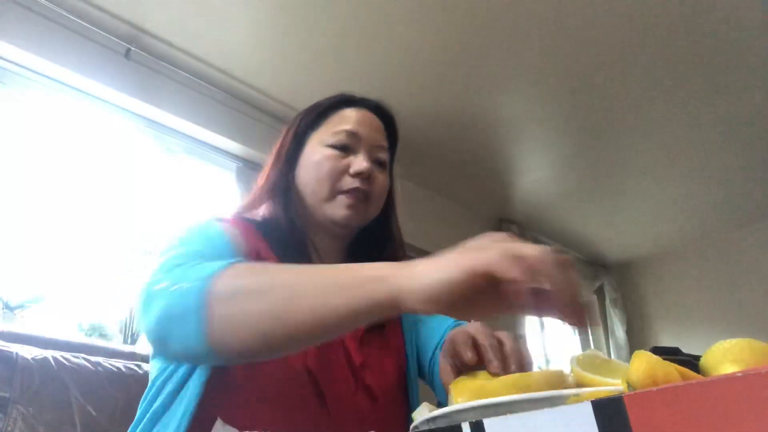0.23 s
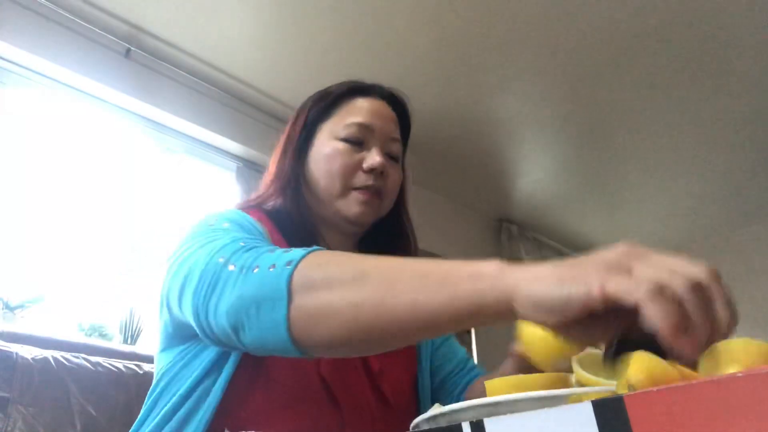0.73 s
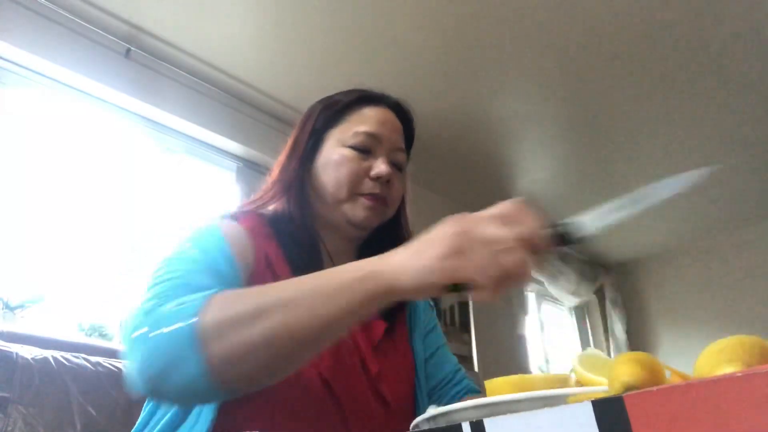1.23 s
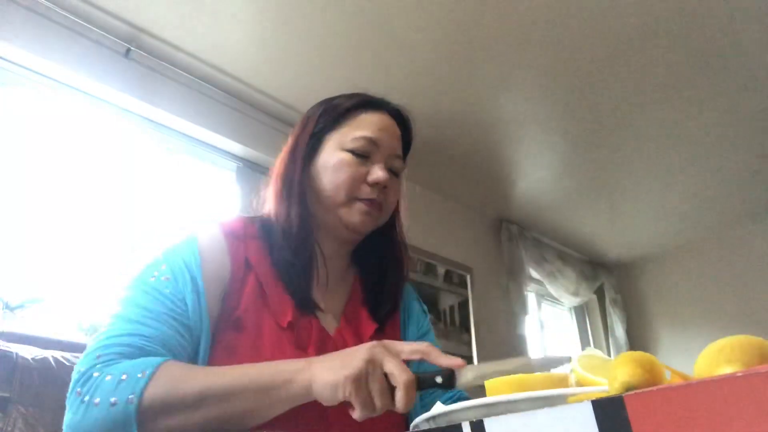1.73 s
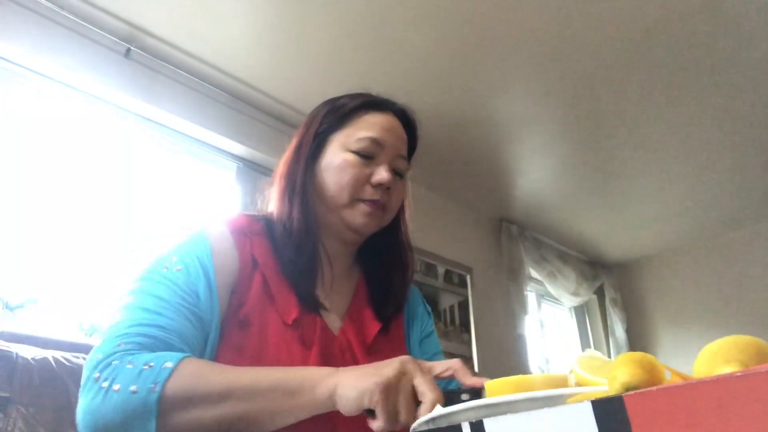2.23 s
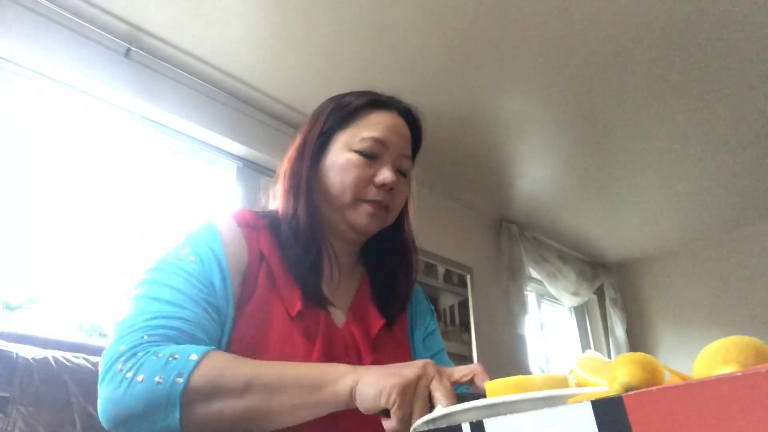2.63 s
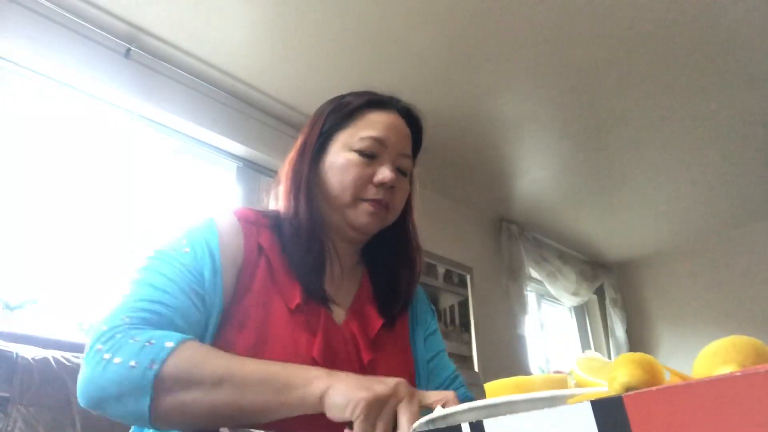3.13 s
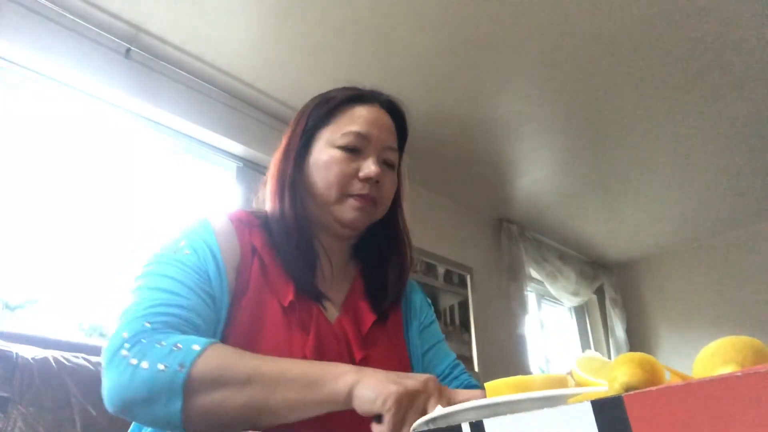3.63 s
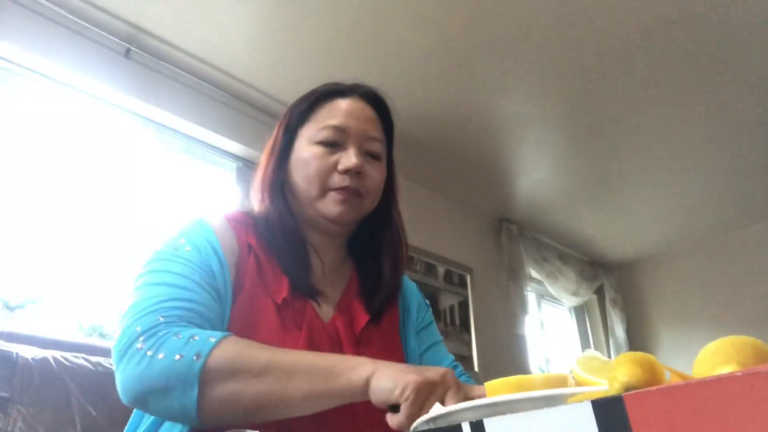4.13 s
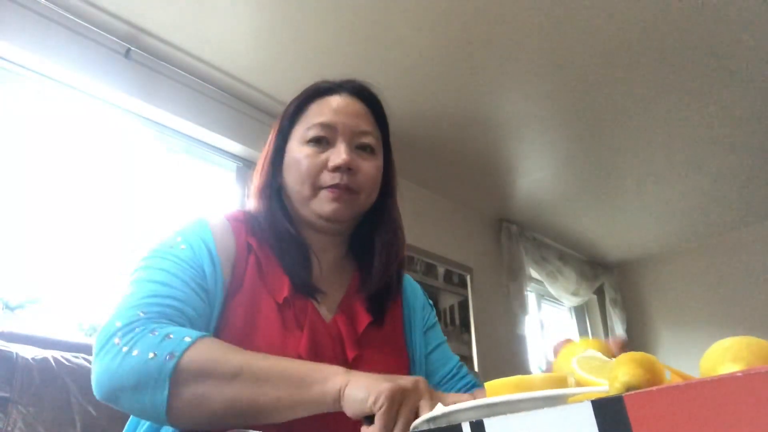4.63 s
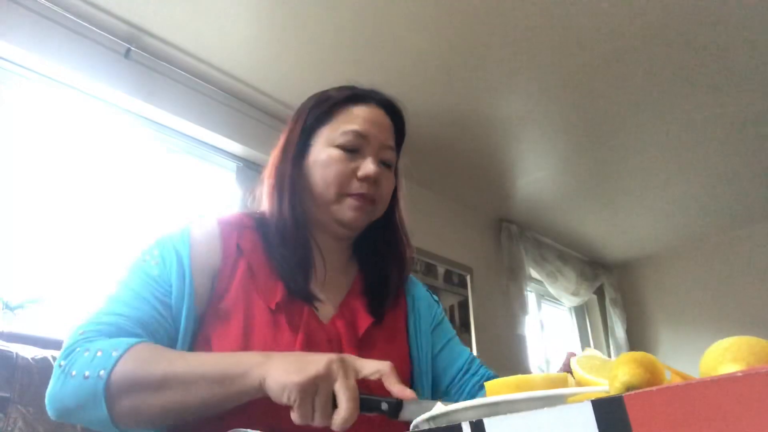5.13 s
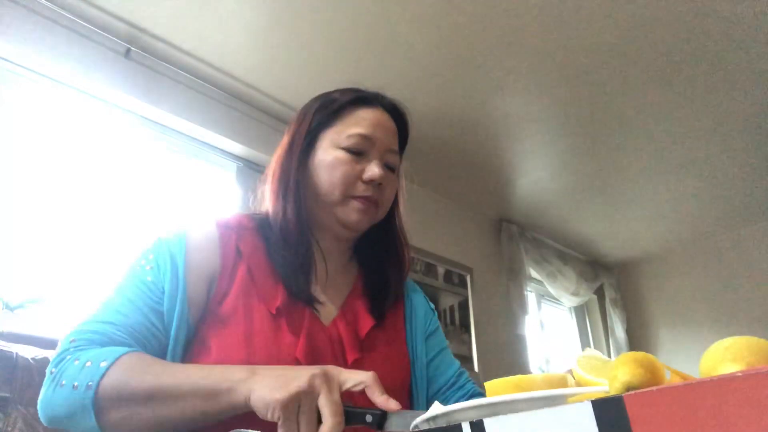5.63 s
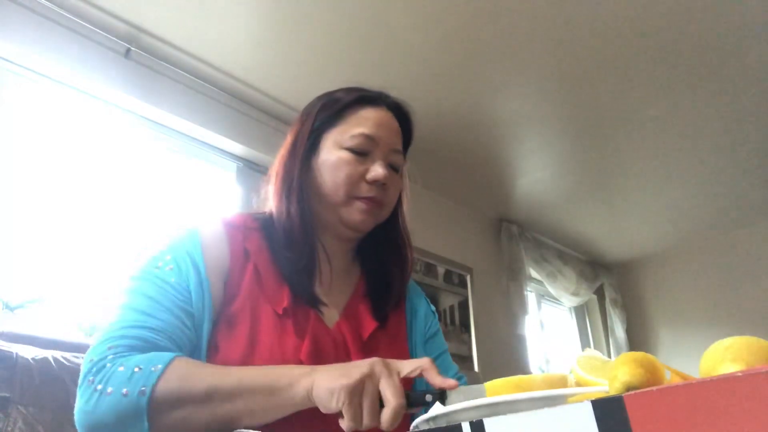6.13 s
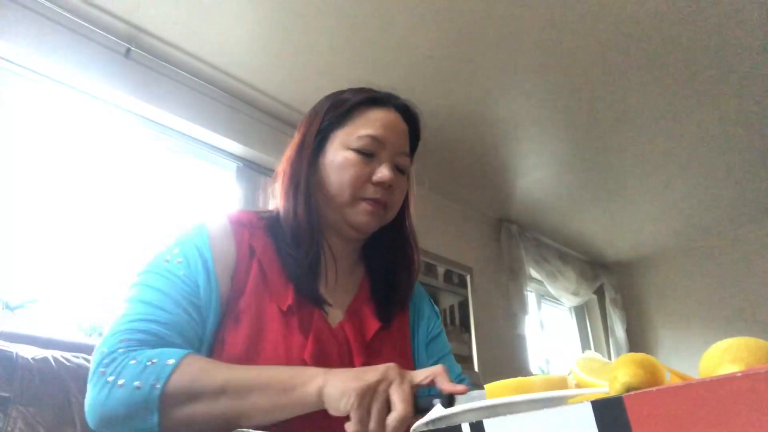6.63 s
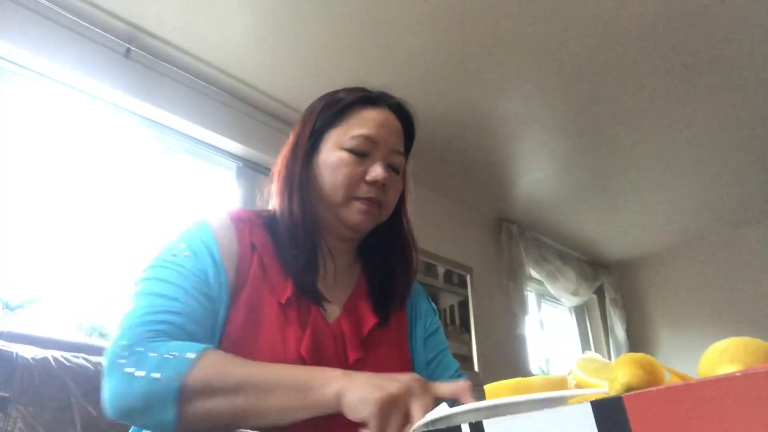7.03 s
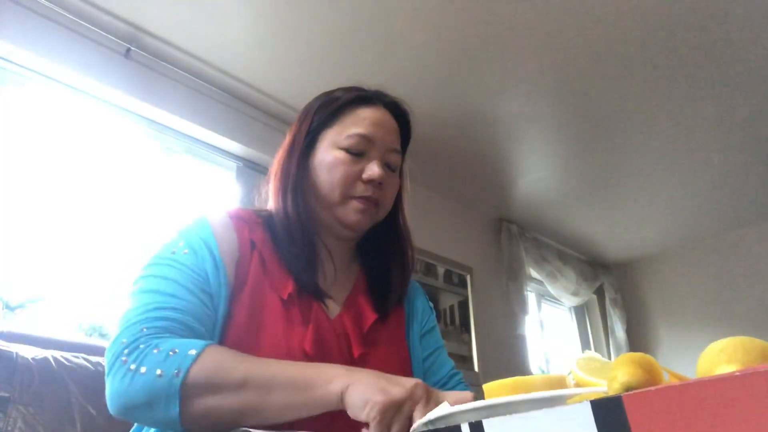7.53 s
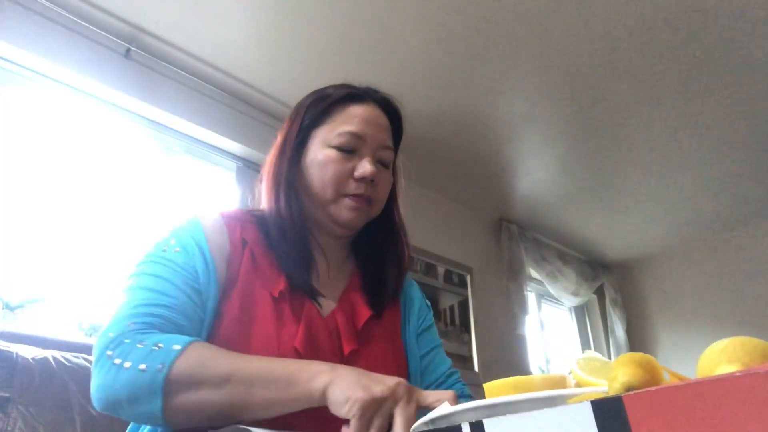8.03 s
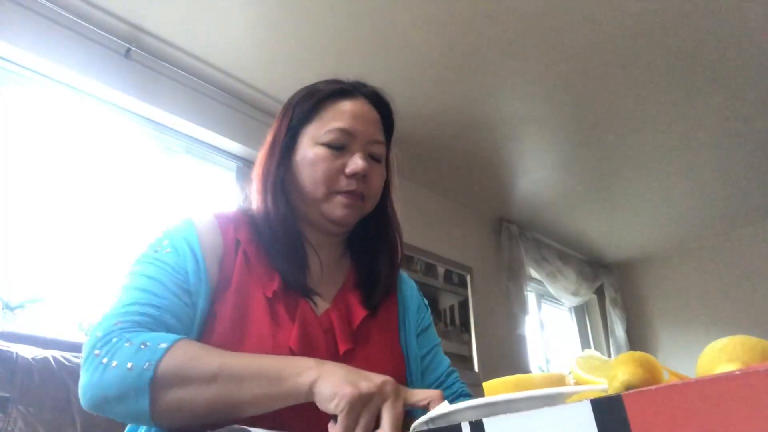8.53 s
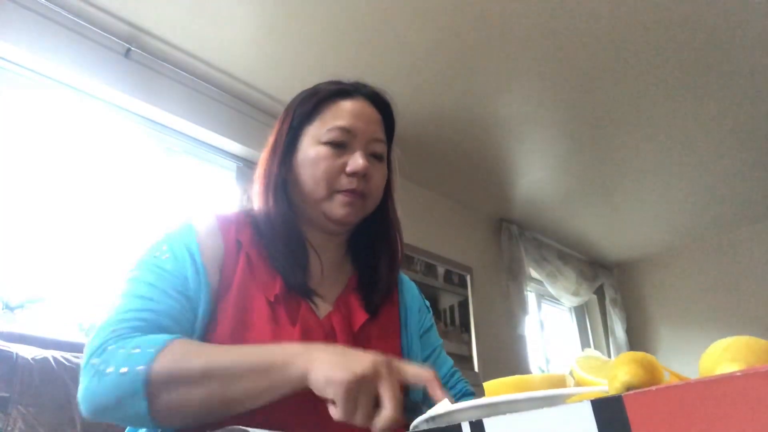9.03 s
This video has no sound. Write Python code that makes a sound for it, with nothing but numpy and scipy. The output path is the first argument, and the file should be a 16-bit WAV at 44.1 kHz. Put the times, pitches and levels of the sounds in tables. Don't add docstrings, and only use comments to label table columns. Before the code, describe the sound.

Slices drop and hands shuffle on a table, giving soft thuds and crackly little taps. Then a blade rasps through rind in uneven strokes and scrapes glazed china, ending in a short bright clink. After a quiet pause, sawing resumes more strongly, with several clinks, the last the loudest and skidding. A small nearby microphone catches short room echoes over a low, soft murmur.

```python
import sys
import numpy as np
from scipy import signal
from scipy.fft import rfft, irfft, next_fast_len
from scipy.io import wavfile

SR = 44100
rng = np.random.default_rng(int(sys.argv[2]) if len(sys.argv) > 2 else 0)


def log_audio(samples):
    frames = np.atleast_2d(samples).T
    limited = np.clip(frames, -1, 1)
    pcm = np.round(limited * 32767).astype(np.int16)
    wavfile.write(sys.argv[1], SR, pcm)


def linear_from_db(decibels):
    return 10 ** (np.asarray(decibels, float) / 20)


N = 408807

# (frequency [Hz], level [dB], t60 [s])
TABLE_MODES = [(46.2, -7, 0.34), (80.6, -5, 0.18), (165, -24.5, 0.085), (197, 8.5, 0.042),
               (300, 1.5, 0.052), (334, -0.5, 0.054), (380.4, 4.5, 0.028), (466, 5.5, 0.027),
               (600, 1, 0.04), (703, 4.5, 0.017), (990, 2.5, 0.006), (1312, -5.5, 0.021), (1960, 0, 0.0033),
               (2450, -11.5, 0.011)]
# (time [s], peak [dB], low modes [dB], high modes [dB], chirp [Hz])
TAPS = [(0.4518, -48, 0, -31, 2500), (0.515, -30, 2, -47, 2780), (0.524, -34, 4, -26, 3980),
        (0.531, -35, -10, -24, 3040), (0.539, -44, -10, -9, 4460), (0.564, -48, -7, -9, 5030),
        (0.569, -44.5, 7, -10, 2770), (0.585, -53, -10, -9, 5000), (0.640, -36, 10, -10, 4090),
        (0.647, -39, 3, -25, 3320), (0.675, -59, -8, -12, 4570), (0.701, -51, -5, -11, 2400),
        (0.714, -51, -5, -19, 5000), (0.6904, -48, 13, -23, 2040), (0.726, -43, -6, -27, 3000),
        (0.736, -43, 4, -30, 2600), (0.759, -40.5, 1, -34, 2900), (0.822, -44, -3, -27, 3100),
        (0.8803, -44, -10, -18, 2530), (0.777, -55, -2, -30, 2500), (0.898, -44, -5, -16, 2330),
        (0.9202, -33.5, -14.5, -24, 2450), (0.938, -49, -13, -19, 2500), (1.035, -49, -14, -16, 2150),
        (2.395, -49, -19, -23, 2200), (3.991, -54, 2, -27, 2100), (4.552, -47, 6, -30, 2000),
        (3.6531, -62, 10, -24, 2000), (3.666, -53, 1, -32, 1960), (4.2364, -61, -7, -25, 4180),
        (4.9247, -50, -6, -24, 2180)]
# (time [s], peak [dB], low modes [dB], high modes [dB], blade chirp [Hz])
CLINKS = [(3.388, -55, -4, -18, 3100), (3.4715, -47.5, 0, -28, 3100), (4.037, -27.5, -17.5, -13.5, 3250),
          (4.3864, -32, -13.5, -13.5, 3160), (4.4359, -37, -17, -12, 3100),
          (4.454, -19.5, -29.5, -12.5, 3160), (7.1663, -20, -3.5, -15, 3467), (7.7319, -27, -6.5, -6, 3120),
          (7.742, -34, -23, -10.5, 4500), (8.09, -28, -1.5, -39, 3420), (8.1057, -37, -12, -21, 3400),
          (8.1905, -25.5, -6, -19.5, 3730), (8.429, -57, -6, 9.5, 3320), (8.5042, -25.5, -6.5, -21, 3550),
          (8.6123, -16, -9.5, -22, 3585), (8.7453, -9.5, -9.5, -23.5, 3320), (9.083, -67, -19, 5, 3560)]


def rms_one(x):
    return x / np.sqrt(np.mean(x ** 2) + 1e-20)


def at_hz(points, hz):
    point_hz, values = np.array(points)[:, 0], np.array(points)[:, 1]
    return np.interp(np.log(hz), np.log(point_hz), values)


def coloured(white, points):
    size = next_fast_len(N)
    hz = np.maximum(np.arange(size // 2 + 1) * SR / size, 1)
    return rms_one(irfft(rfft(white, size) * linear_from_db(at_hz(points, hz)), size)[:N])


def ring(force, hz, t60):
    r, w = linear_from_db(-60 / (t60 * SR)), 2 * np.pi * hz / SR
    return signal.lfilter([0, np.sin(w)], [1, -2 * r * np.cos(w), r * r], force + 1e-18)


def struck(modes, blows, colour_db, scatter_db, chatter_s, rebound_db=-0.5):
    luck = rng.standard_normal((len(blows), len(modes)))
    lags = rng.random((len(blows), 5)) * [0, 1, 1, 1, 1]
    at = np.round((np.array(blows)[:, :1] + chatter_s * lags) * SR).astype(int)
    touches = linear_from_db(rebound_db * (lags > 0) - 0.6 * lags) * rng.choice([-1, 1], lags.shape)
    out = np.zeros(N)
    for k, (hz, level_db, t60) in enumerate(modes):
        strength = linear_from_db(colour_db[:, k] + level_db + scatter_db * luck[:, k])
        strength = strength * (-1) ** k
        force = np.bincount(at.ravel(), (strength[:, None] * touches).ravel(), N)
        out += ring(force, hz, t60)
    return out


def landing(blows, modes, top_db):
    hz = np.array(modes)[:, 0]
    favour_db, favour_octaves = 8, 0.061
    gains = []
    for (s, db, low, high, chirp_hz), top in zip(blows, top_db + np.zeros(len(blows))):
        balance = [(2300, low), (3100, -5.5), (4200, -9.0), (5000, -8.0), (6400, high + 8),
                   (8200, high + 8), (9100, high + 3), (13000, high + top + 16)]
        favour = favour_db * np.exp(-(np.log2(hz / chirp_hz) / favour_octaves) ** 2)
        gains.append(db - 8.5 + at_hz(balance, hz) + favour)
    return np.array(gains)


def grit(per_s, spread_db):
    sizes = linear_from_db(spread_db * np.minimum(rng.exponential(1, N), 4)) * rng.choice([-1, 1], N)
    return rms_one(sizes * (rng.random(N) < per_s / SR))


def spread(x, lag_s, late_s):
    size = next_fast_len(N + SR // 2)
    hz = np.arange(size // 2 + 1) * SR / size
    turns = 2 * lag_s * np.sqrt(1000 * hz) + late_s * hz
    return irfft(rfft(x, size) * np.exp(-2j * np.pi * turns), size)[:N]


def china(glancing):
    # (frequency [Hz], struck square [dB], struck aslant [dB], t60 [s])
    china_modes = [(1226, -13, 2.5, 0.03), (1296, -0.5, -1, 0.042), (2057, 4.5, 7.5, 0.014),
                   (2198, 5.5, -3.5, 0.029), (2317, -2, -3.5, 0.02), (2803, -2, -9, 0.02), (3127, -7.5, -7, 0.019),
                   (3340, -7.5, -11, 0.019), (3555, -2.5, -9, 0.018), (3730, -8, -10, 0.032),
                   (4340, -9, -8, 0.025), (4554, -10, -11, 0.075), (4750, -7.5, -14, 0.027),
                   (4940, -6.5, -18.5, 0.035),
                   (5390, -10, -33.5, 0.036), (5280, -8, -25, 0.044), (5556, -7.5, -34, 0.047),
           (5900, -10, -18, 0.05), (6120, -18, -11.5, 0.015), (6610, -2, -25, 0.035),
           (6760, -14.5, -21, 0.02), (7790, -8, -14.5, 0.036), (7900, -18, -7, 0.015),
                   (9145, -17, -28, 0.09), (9400, -23, -10, 0.0306), (9900, -29.5, -15, 0.021),
             (10630, -11, -21.5, .035), (11140, -25.5, -21.5, .012), (12300, -17.5, -18, 0.022),
             (12650, -35, -20.5, .025), (13600, -14, -22.5, .035), (14150, -36, -26, 0.0161),
             (15200, -27.5, -23, .015)]
    return [(hz, aslant if glancing else square, t60) for hz, square, aslant, t60 in china_modes]


def hush():
    # (frequency [Hz], level [dB])
    murmur = [(12, -34), (20, -1), (91, 2.5), (504, -2), (767, -2.5), (1380, -8.5), (1680, -14),
              (3120, -18.5), (3690, -15.5), (4250, -21.5), (5620, -20.5), (9860, -28.5), (13800, -29),
              (16300, -28)]
    return linear_from_db(-67 + 1.5) * coloured(rng.standard_normal(N), murmur)


def room(x, gap_s):
    # (frequency [Hz], t60 [s])
    decay = [(60, 1), (250, 0.72), (1000, 0.61), (3000, 0.54), (8000, 0.44), (15000, 0.29)]
    t = np.arange(SR) / SR
    edges = 40 * 2 ** np.arange(0, 9, .8)
    white, tail = rng.standard_normal((2, SR)), 0
    for k, (low, high) in enumerate(zip(edges, edges[1:])):
        band_pass = signal.butter(2, [low, high], "band", fs=SR, output="sos")
        band = signal.sosfilt(band_pass, white[k % 2])
        tail = tail + band * linear_from_db(-60 * t / at_hz(decay, np.sqrt(low * high)))
    tail *= np.clip(t / gap_s - 1, 0, 1)
    return signal.fftconvolve(x, tail / np.sqrt(np.sum(tail ** 2)))[:N]


def strokes():
    # (time of peak [s], swell [s], fade [s], rasp [dB], table rumble [dB])
    slides = [(0.15, 0.091, 0.99, -68, -65), (0.36, 0.1, 0.024, -67.5, -51),
              (0.406, 0.026, 0.053, -59, -56), (0.506, 0.0044, 0.013, -75, -52),
              (0.675, 0.028, 0.077, -56, -36), (0.74, 0.047, 0.024, -68, -37),
              (0.886, 0.081, 0.039, -62, -61), (0.92, 0.013, 0.077, -65, -70),
              (1.042, 0.025, 0.066, -64.5, -71), (1.12, 0.039, 0.18, -77, -56),
              (1.28, 0.17, 0.044, -75, -72), (4.52, 0.012, 0.048, -77, -65), (4.62, 0.11, 0.05, -81, -59),
              (4.79, 0.076, .01, -93, -66), (9.114, 0.086, 0.063, -75, -55.5),
              (9.233, 0.027, 0.032, -68.5, -54.5)]
    first_cut = [(2.158, 0.058, 0.026, -72.5, -60), (2.38, 0.27, 0.018, -66.5, -56.5),
                 (2.52, 0.074, 0.19, -63.5, -67), (2.59, 0.068, 0.015, -66.5, -49),
                 (2.655, 0.022, 0.08, -56, -48.5), (2.70, 0.035, .03, -62, -47),
                 (2.735, 0.044, 0.016, -64, -52.5), (2.805, 0.0089, 0.11, -56.5, -53),
                 (2.86, 0.079, 0.054, -55, -43), (2.91, .06, .015, -64, -51),
                 (2.982, 0.036, 0.067, -56.5, -48.5), (3.04, 0.069, 0.022, -60.5, -57),
                 (3.10, 0.034, 0.068, -65.5, -59.5), (3.395, 0.05, 0.056, -71, -56.5),
                 (3.46, 0.099, 0.06, -64.5, -60), (3.55, 0.1, 0.02, -82, -59.5),
                 (3.606, 0.046, 0.025, -65, -65), (3.665, 0.023, 0.031, -66.5, -57.5),
                 (4.18, 0.018, 0.05, -62, -65), (4.238, 0.067, 0.03, -58.5, -62),
                 (4.384, 0.24, 0.15, -65.5, -57.5)]
    second_cut = [(5.826, 0.14, 0.025, -76, -64), (5.946, 0.031, 0.03, -67, -65),
                  (6.032, 0.009, 0.02, -80, -66), (6.23, 0.097, 0.11, -70.5, -60.5),
                  (6.32, 0.08, 0.044, -69, -71), (6.358, 0.093, 0.024, -78, -57.5),
                  (6.5, 0.079, 0.083, -72.5, -67), (6.67, 0.11, 0.11, -66, -59.5),
                  (6.835, 0.044, 0.088, -55, -44), (6.982, 0.035, 0.084, -52.5, -41),
                  (7.156, 0.085, 0.02, -54.5, -48.5), (7.22, 0.012, 0.042, -69, -53),
                  (7.32, 0.068, 0.084, -57, -68), (7.39, .03, 0.27, -68, -64),
                  (7.54, 0.061, 0.65, -68, -63.5), (7.8, 0.0071, 0.018, -56, -50),
                  (7.914, 0.075, 0.056, -64.5, -75), (7.972, 0.011, 0.025, -83, -59.5),
                  (8.39, 0.058, 0.0092, -71, -62), (8.44, 0.033, 0.1, -62.5, -57.5)]
    # (time [s], level over the rasp [dB])
    on_china = [(0.3, -7.5), (0.7, 2.5), (0.85, -4), (2.3, -5), (2.52, -28), (2.7, -23), (2.8, -7.5),
                (3.0, -2), (3.4, 1.5), (3.5, 4.5), (3.6, -6), (4.36, -8.5), (6.3, -9), (6.85, -27),
                (6.97, -9), (7.27, -4), (7.32, 1), (7.38, -6), (7.6, -6.5), (8.4, -5)]
    # (frequency [Hz], density [dB per Hz])
    rasp_colour = [(410, -35.5), (700, -20), (777, -25), (1210, -2.5), (1420, -9.5), (2550, -9),
                   (3300, -8.5), (3790, -11), (5000, -11.5), (8650, -25), (16000, -33)]
    edge_db, bend = -13.5, 1.38
    new_fruit_s = 5.5

    now = np.arange(N) / SR
    t, rasping, rumbling = np.arange(0, N + 64, 64) / SR, 0, 0
    for s, swell_s, fade_s, rasp_db, rumble_db in slides + first_cut + second_cut:
        shape_db = edge_db * (np.abs(t - s) / np.where(t < s, swell_s, fade_s)) ** bend
        rasping = rasping + linear_from_db(rasp_db + shape_db) ** 2
        rumbling = rumbling + linear_from_db(rumble_db + shape_db) ** 2
    rasping = np.interp(now, t, np.sqrt(rasping))
    rumbling = np.interp(now, t, np.sqrt(rumbling))

    slips = grit(per_s=2600, spread_db=1.0)
    catches = slips + linear_from_db(-1.0) * grit(per_s=190, spread_db=1.0)
    first, second = np.split(catches, [round(new_fruit_s * SR)])
    grates = []
    for part, glancing, damping in [(first, True, .45), (second, False, .8)]:
        grates.append(rms_one(sum(linear_from_db(db) * ring(part, hz, damping * t60)
                                  for hz, db, t60 in china(glancing)[:17])))
    grate = linear_from_db(np.interp(now, *np.transpose(on_china))) * np.concatenate(grates)

    rumble = rms_one(sum(linear_from_db(db) * ring(grit(per_s=550, spread_db=4.5), hz, 1.08 * t60)
                         for hz, db, t60 in TABLE_MODES[2:]))
    thin_bass = signal.butter(1, 70, "high", fs=SR, output="sos")
    rumble = signal.sosfilt(thin_bass, rumble)
    return linear_from_db(1.5) * rasping * (coloured(slips, rasp_colour) + grate) + linear_from_db(-2.0) * rumbling * rumble


def knocks():
    # (time [s], peak [dB], deep modes [dB], upper modes [dB])
    slices_drop = [(0.403, -28.5, -18, 3.5), (0.519, -15, -5.5, -5.5), (0.636, -16, -10, -4.5),
                   (0.680, -30, -20, -4), (0.692, -19, -34, -3), (0.703, -30, -18, -1), (0.711, -33, -5, 8),
                   (0.722, -25, -22, 7.5), (0.742, -32, -28, -6), (0.756, -39.5, -28, 12),
                   (0.774, -32, -28, 3.5), (0.818, -28.5, -23, 0), (0.896, -32, -39, -30),
                   (2.392, -33, -30, 2), (3.82, -45, -37, 3), (6.474, -44, -9, -17), (7.761, -31, -17, 6.5),
                   (7.816, -52, -20, 4)]
    arm_leans = [(1.034, -37, -3, 2.5), (1.10, -49, 3, -18), (1.14, -54, -14, -13), (1.219, -45.5, -2, -1),
                 (1.265, -52, 0, 10), (1.415, -41.5, -6, -1), (1.435, -51, -9, 5), (1.53, -57.5, 9, -13),
                 (1.549, -58, 2, -14), (1.843, -44.5, -2.5, 1.5), (4.442, -49, -1.5, -24),
                 (4.549, -46, -10, -3), (4.584, -48, -15, 4), (4.822, -48.5, -22, -2),
                 (4.922, -40.5, -2.5, 0), (9.222, -46, -7, -22)]
    knife_pushes = [(1.946, -43, -21, -0.5), (2.132, -41, -9, -22), (2.146, -40.5, -11, -9),
                    (2.586, -42, -32, 1.5), (2.796, -48.5, 10.5, 5), (4.011, -41, -16, -1),
                    (4.04, -38.5, -2.5, -17), (5.109, -55, 1, -9), (5.234, -60.5, 7, -12),
                    (5.31, -59, -1, -21), (5.806, -55, -7, -12), (6.028, -65, 10, -17),
                    (6.135, -44, -32, 2.5), (6.548, -46.5, -33, -3), (7.165, -22.5, -13, 8.5),
                    (8.089, -35.5, -2.5, 1.5), (8.151, -40.5, -17, 6), (8.188, -44, -12, 5),
                    (8.478, -42.5, -18, 1.5), (8.503, -42.5, -10, -0.5), (8.611, -28, -18, 2),
                    (8.743, -21.5, -11.5, 1.5), (9.147, -51, -19, -10)]
    kinds = [(slices_drop, -48.5), (arm_leans, -15), (knife_pushes, -25)]
    blows = sorted((s, db, shudder, deep, upper) for rows, shudder in kinds for s, db, deep, upper in rows)
    hz = np.array(TABLE_MODES)[:, 0]
    colour_db = []
    for s, db, shudder, deep, upper in blows:
        balance = [(90, shudder + 13), (150, deep + 3), (200, deep + 3), (300, 0.0047), (600, 0.007),
                   (900, upper + 6)]
        colour_db.append(db - 8.5 + at_hz(balance, hz))
    colour_db = np.array(colour_db)
    legs = struck(TABLE_MODES[:2], blows, colour_db[:, :2], scatter_db=0.5, chatter_s=0.0012,
                  rebound_db=-13.5)
    top = struck(TABLE_MODES[2:], blows, colour_db[:, 2:], scatter_db=3.5, chatter_s=0.0018,
                 rebound_db=-22)
    no_deep = signal.butter(2, 105, "high", fs=SR, output="sos")
    soft = np.exp(-2 * np.pi * 1000.0 / SR)
    return signal.lfilter([1 - soft], [1, -soft], legs + signal.sosfilt(no_deep, top))


def taps():
    # (frequency [Hz], level [dB], t60 [s])
    handle = [(1320, 5, 0.0031), (2500, 1.5, 0.006), (3960, 8.5, 0.0017), (5460, 4, 0.0026),
              (6600, -1, .002), (7600, -2, 0.0026), (8960, 3, 0.004), (11500, -11, 0.002),
              (12900, -17, .002), (14500, -18, .002)]
    colour_db = landing(TAPS, handle, top_db=7)
    return linear_from_db(5.0) * struck(handle, TAPS, colour_db, scatter_db=-3.0, chatter_s=0.0051, rebound_db=-5.5)


def chirps(blows, level_db, t60, lead_db):
    out, t = np.zeros(N), np.arange(-SR // 80, SR // 20) / SR
    for s, db, low, high, chirp_hz in blows:
        at = round(s * SR) - SR // 80
        blow = np.where(t > 0, linear_from_db(-60 * t / t60) * np.minimum(t / 0.00081, 1), 0)
        graze = linear_from_db(lead_db - 1650.0 * np.abs(t))
        out[at:at + len(t)] += linear_from_db(db + level_db) * (blow + graze) * np.sin(2 * np.pi * chirp_hz * t)
    return out


def singing():
    # (start [s], length [s], level [dB], first pitch [Hz], last pitch [Hz])
    skids = [
        (2.652, 0.072, -64, 3350, 3250),
        (4.164, 0.1, -68, 1250, 1900),
        (4.277, 0.14, -63.5, 1800, 2040),
        (4.311, 0.093, -63, 3270, 3140),
        (7.225, 0.076, -55.5, 1290, 1280),
        (7.29, 0.058, -47.5, 2120, 2137),
        (7.304, .09, -57.5, 1290, 1260),
        (7.681, .05, -63, 2080, 2100),
        (7.51, 0.088, -70, 2900, 3200),
        (7.53, 0.059, -67, 2150, 2230),
    ]
    waver_hz, steady = 45.0, 0.99
    out, r = np.zeros(N), np.exp(-2 * np.pi * waver_hz / SR)
    noise = rng.standard_normal((len(skids), 2, SR // 4))
    for (s, length_s, db, first_hz, last_hz), (a, b) in zip(skids, noise):
        t = np.arange(min(round(length_s * SR), SR // 5)) / SR
        waver = signal.lfilter([1], [1, -r], a + 1j * b)[-len(t):] * np.sqrt((1 - r * r) / 2)
        turns = first_hz * t + (last_hz - first_hz) * t ** 2 / (2 * length_s)
        note = np.real((steady + waver) * np.exp(2j * np.pi * turns))
        at = round(s * SR)
        out[at:at + len(t)] += linear_from_db(db) * np.sin(np.pi * t / length_s) ** .5 * note
    return out


def nicks():
    # (time [s], peak [dB], pitch [Hz], t60 [s])
    glaze_nicks = [(2.985, -49, 2050, .03), (3.005, -48, 1980, .03), (3.036, -47, 2140, .02),
                   (3.415, -51, 2040, 0.049), (3.420, -54, 1300, .05), (3.457, -54, 2030, 0.017),
                   (3.470, -50, 1300, .03), (3.506, -56, 2090, .03), (3.669, -54, 1290, 0.057),
                   (4.049, -39.5, 4440, 0.024), (4.062, -40, 3360, 0.028), (4.395, -49, 4700, 0.022),
                   (4.453, -29, 3600, 0.017), (4.465, -37, 4500, 0.022), (4.478, -35, 3380, 0.028),
                   (7.194, -36, 2040, 0.034), (7.815, -48, 1400, .012), (8.504, -42, 2220, .025),
                   (8.613, -33, 2160, 0.074), (8.743, -20, 3270, 0.013), (8.749, -16.5, 2200, 0.018),
                   (8.772, -24.5, 2095, 0.052)]
    out, t = np.zeros(N), np.arange(SR // 10) / SR
    for s, db, hz, t60 in glaze_nicks:
        at = round(s * SR)
        shape = linear_from_db(db - 60 * t / t60) * np.minimum(t / 0.0012, 1)
        out[at:at + len(t)] += shape * np.sin(2 * np.pi * hz * t)
    return out


def blow_colour(blows, modes):
    # (time of blow [s], pitch [Hz], gain [dB])
    emphasis = [(4.037, 2100, -2), (4.037, 4554, -9), (4.3857, 1950, 4), (4.4539, 2030, 8.5),
                (4.4539, 2840, -2), (4.4539, 3470, 2), (4.4539, 4554, -8), (4.4539, 5350, -11),
                (7.1655, 1296, -1), (7.1655, 2150, -4), (7.1655, 2803, -3.5), (7.1655, 4340, 7),
                (7.1655, 4720, -12), (7.742, 4554, -6), (7.7322, 3230, 11), (8.091, 2200, -1.5),
                (8.1904, 2200, -5), (8.1904, 1296, -1), (8.1904, 3730, -9), (8.5045, 2200, 0),
                (8.5045, 3555, 0), (8.5045, 1296, -6), (8.6124, 2160, 5), (8.6124, 3555, -7),
                (8.6124, 3730, 6.5), (8.6124, 4750, -2.5), (8.6124, 5556, -4), (8.7453, 1296, -3.5),
                (8.7453, 2123, 7), (8.7453, 3190, 5), (8.7453, 3670, -4), (8.7453, 4340, 2),
                (8.7453, 4930, 5.5), (8.7453, 5556, -0.5)]
    reach_octaves, reach_s = 0.06, .007
    s, hz = np.array(blows)[:, :1], np.array(modes)[:, 0]
    return sum(db * (np.abs(s - at) < reach_s) * np.exp(-(np.log2(hz / pitch_hz) / reach_octaves) ** 2)
               for at, pitch_hz, db in emphasis)


def clinks():
    # (frequency [Hz], level [dB], t60 [s])
    crack = [(1364, 3.5, 0.002), (2500, -18, 0.0026), (3650, 7, 0.00099), (5250, -0.5, 0.0031),
             (6020, -2, 0.0018), (7500, -9, 0.0063), (8200, -16.5, 0.0012), (9970, -8.5, 0.0023),
             (11270, -12.5, 0.00325), (13000, -21, 0.0029), (14500, -17.5, 0.0035)]
    glancing_s = (4.037, 4.3852, 4.4358, 4.4537, 7.7319, 7.7433, 8.1057, 8.4288)
    # (time [s], peak [dB], low modes [dB], high modes [dB], blade chirp [Hz])
    skid = (8.746, -7, -15, -9, 3250.5)
    out = 0
    for glancing, top_db, crack_db in [(True, -8.5, 4.5), (False, -14.5, -1)]:
        blows = [row for row in CLINKS if np.isclose(row[0], glancing_s, atol=1 / 200).any() == glancing]
        if glancing:
            blows = blows + [skid]
        modes = china(glancing)
        out = out + linear_from_db(crack_db) * struck(crack, blows, landing(blows, crack, top_db), scatter_db=0.0,
                                           chatter_s=0.0033, rebound_db=-3.5)
        colour_db = landing(blows, modes, top_db) + blow_colour(blows, modes)
        out = out + struck(modes, blows, colour_db, scatter_db=2.5, chatter_s=0.00081, rebound_db=-22)
    return out


def scene():
    rubbing = strokes()
    dull = spread(taps(), lag_s=0.0044, late_s=-0.00161) + spread(knocks(), lag_s=0.001689, late_s=0.002158)
    tones = chirps(TAPS, level_db=1.5, t60=0.0064, lead_db=-20.5)
    tones = tones + chirps(CLINKS, level_db=0.5, t60=0.0089, lead_db=-19.5)
    beamed = spread(tones, lag_s=.0035, late_s=-0.0015)
    glaze = singing() + nicks()
    struck_china = spread(clinks(), lag_s=.0035, late_s=-0.001462)

    to_room = linear_from_db(-2.0) * struck_china + linear_from_db(-14.5) * beamed + linear_from_db(-7.0) * dull
    to_room = to_room + linear_from_db(-8.5) * rubbing + linear_from_db(-11.5) * glaze
    echoes = room(to_room, gap_s=0.0021)
    blows = struck_china + beamed + dull
    ceiling = linear_from_db(-14.0) * np.roll(blows, round(.011 * SR))
    return (blows + rubbing + glaze + ceiling + echoes + hush())[None]


def band_limit(x):
    return signal.sosfilt(signal.butter(12, 16480, fs=SR, output="sos"), x)


def record(dry):
    no_bass = signal.sosfilt(signal.butter(4, 36, "high", fs=SR, output="sos"), dry)
    mix = signal.sosfilt(signal.cheby2(12, 60, 16700, fs=SR, output="sos"), no_bass)
    return band_limit(mix)


dry = scene()
out = record(dry)
log_audio(out)
```